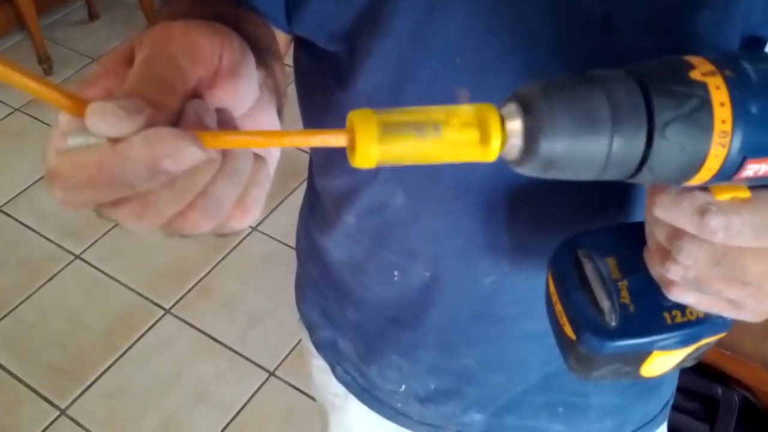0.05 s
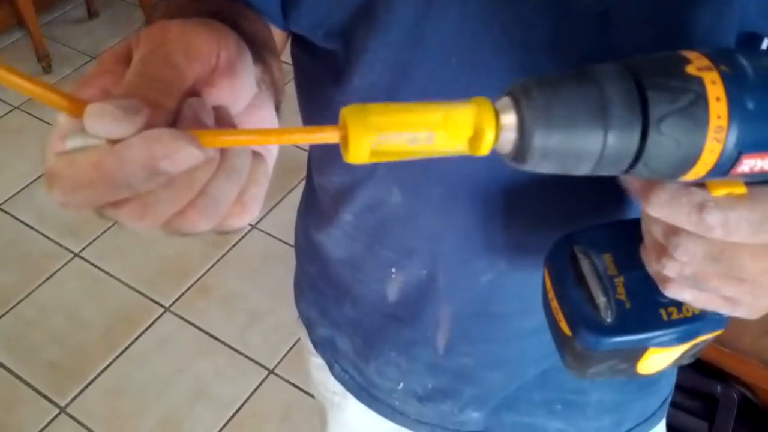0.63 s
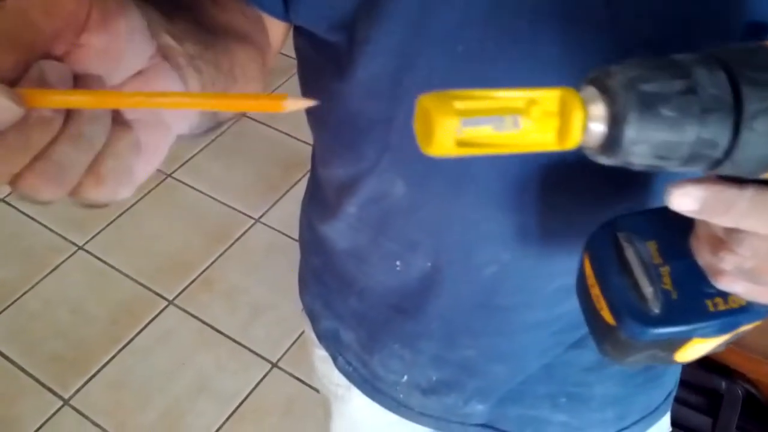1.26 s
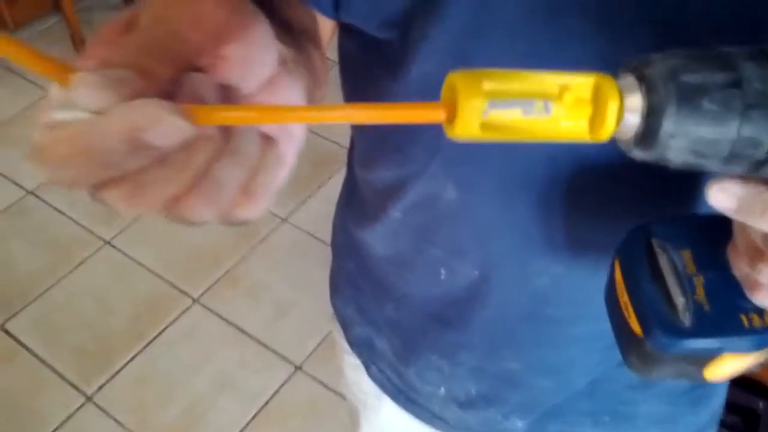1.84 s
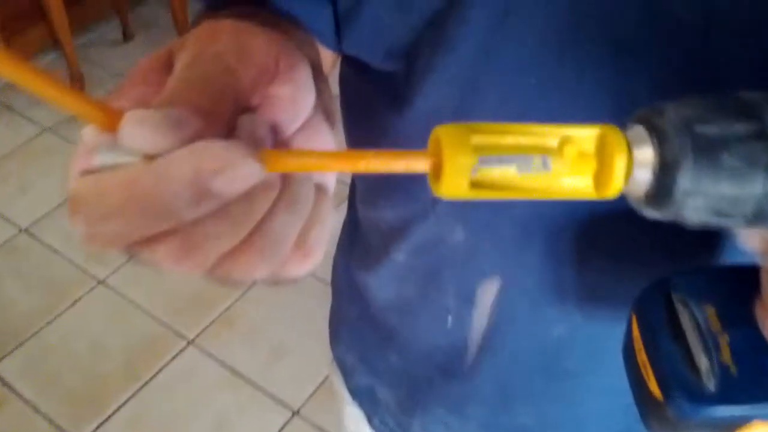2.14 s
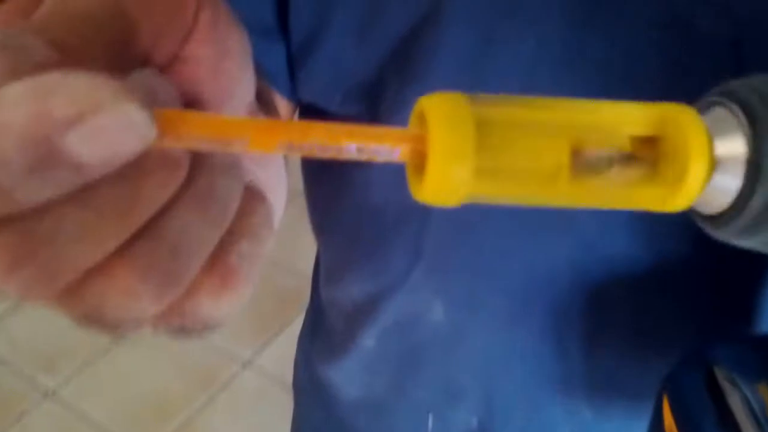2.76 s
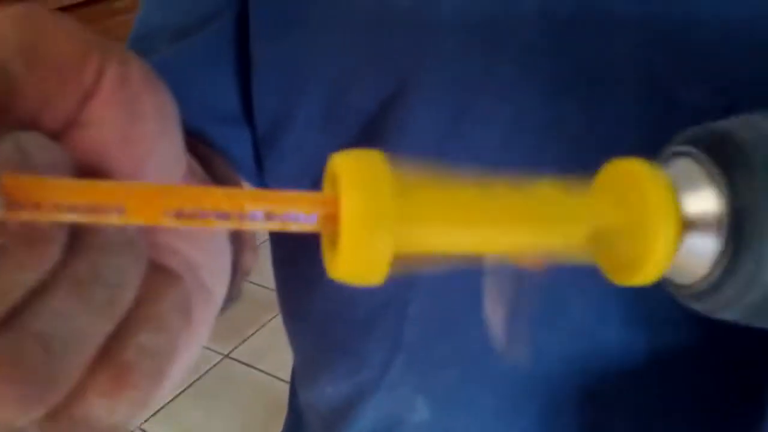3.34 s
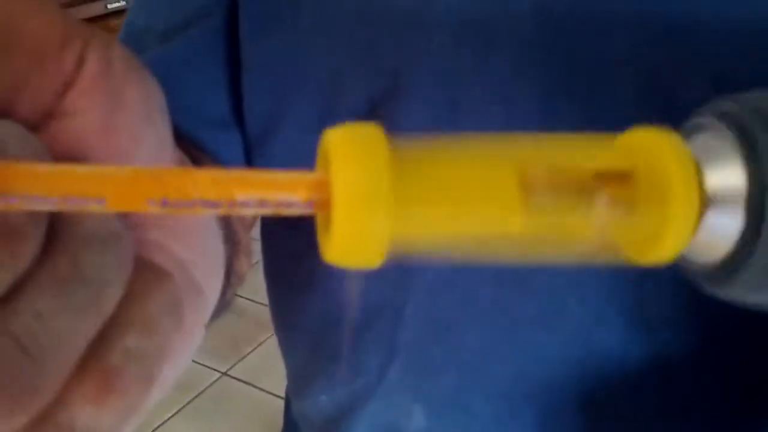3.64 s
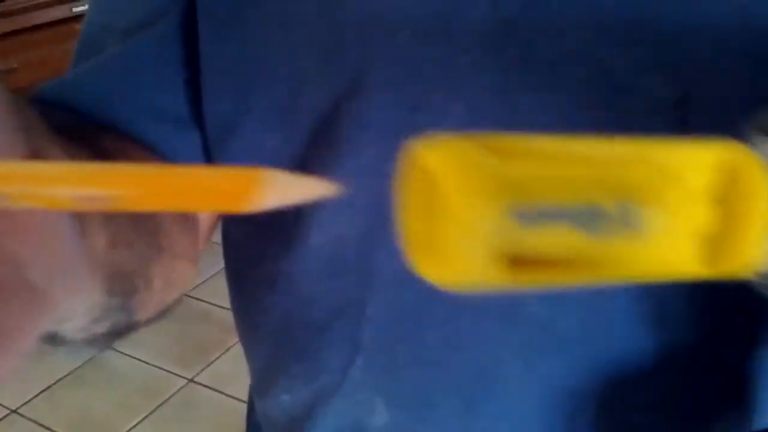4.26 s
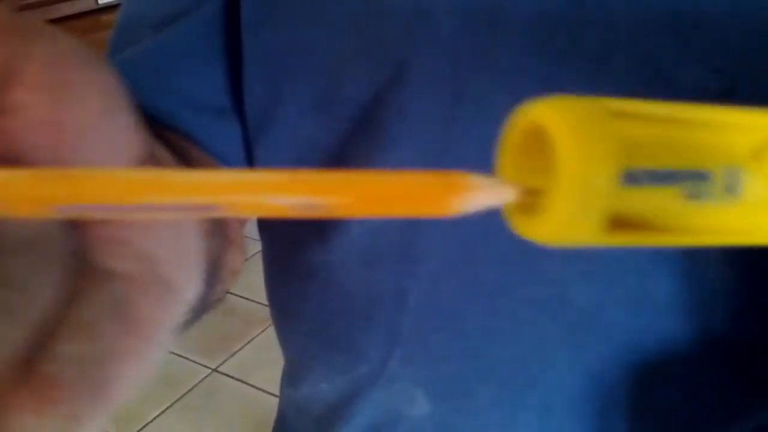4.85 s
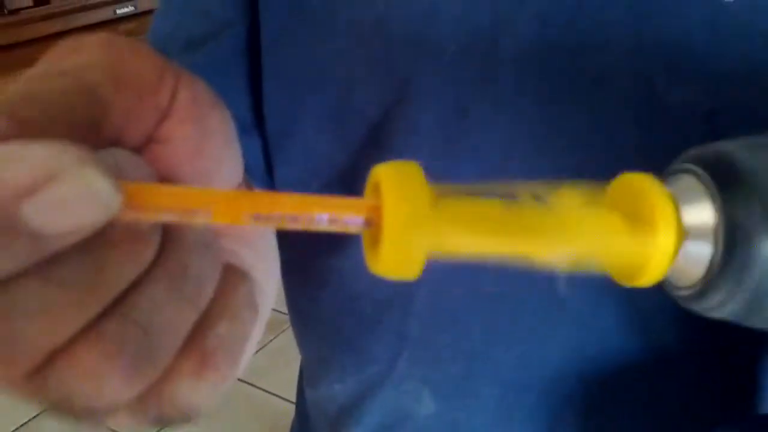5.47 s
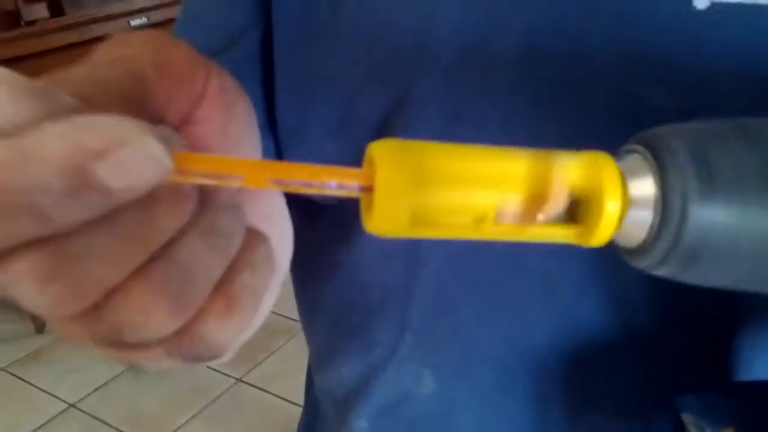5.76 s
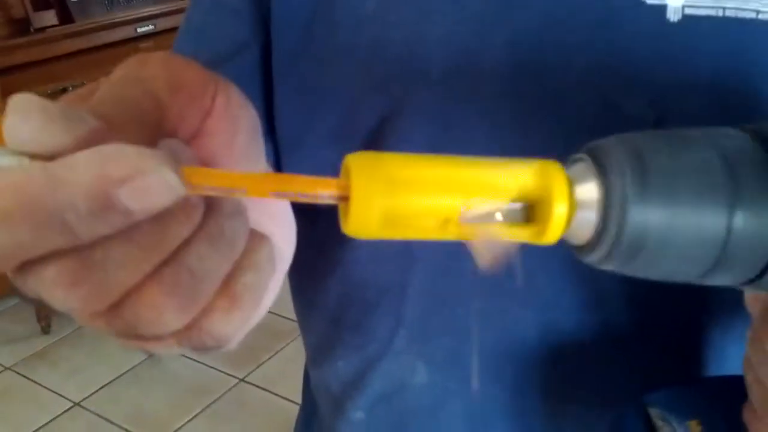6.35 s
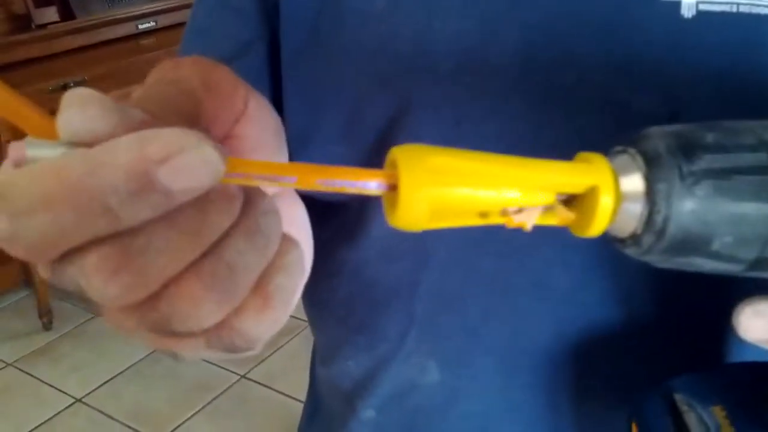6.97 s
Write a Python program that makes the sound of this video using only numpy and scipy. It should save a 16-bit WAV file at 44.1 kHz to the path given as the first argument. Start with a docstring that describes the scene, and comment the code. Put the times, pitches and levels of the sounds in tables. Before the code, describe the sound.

Three short runs of a whining power drill turn a pencil sharpener, rasping and snapping off wood chips, each stopping with a clack.

```python
"""A cordless drill turns a plastic pencil sharpener in three bursts, near a mono microphone in a tiled room.
It is running at the start: the motor hums, gears and brushes rattle, the blade rasps, wood chips snap off.
At 0.6 s it brakes with a clack; the pencil slides out and in. In the second burst (2.2-3.9 s) a puff,
then a hard knock, reach the microphone. The pencil slides again, the third burst (5.3-6.7 s) brings
one more puff, and a last slide and a few taps follow. Room rumble and an appliance hum lie underneath."""
import sys
import numpy as np
from scipy import signal
from scipy.fft import rfft, irfft, next_fast_len
from scipy.io import wavfile
from scipy.ndimage import uniform_filter1d, map_coordinates

SR = 44100
rng = np.random.default_rng(int(sys.argv[2]) if len(sys.argv) > 2 else 0)


def inscribe(sig):
    """Save sig as 16-bit PCM at rate SR to the path in sys.argv[1].

    A 1-D sig is mono; a 2-D sig holds one channel per row.
    Samples are clipped to [-1, 1] before scaling.
    """
    pcm = np.round(np.clip(np.atleast_2d(sig).T, -1, 1) * 32767)
    wavfile.write(sys.argv[1], SR, pcm.astype(np.int16))


N = 313551
T = np.arange(N) / SR
FULL_SPEED_HZ = 350  # nominal shaft speed


def amp(db):
    """Decibels to gain."""
    return 10 ** (np.asarray(db) / 20)


def unit(x):
    """x at rms 1."""
    return x / np.sqrt(np.mean(x ** 2) + 1e-20)


def along(points, hz):
    """(freq_hz, value) points read on a log axis."""
    freqs, values = np.transpose(points)
    return np.interp(np.log(hz + 1), np.log(freqs + 1), values)


def wobble(rate_hz, steps=8):
    """Smooth random curve, rate_hz knots a second."""
    knots = rng.standard_normal(int(N * rate_hz / SR) + 4)
    fine = np.arange(len(knots) * steps) / steps
    return np.interp(T * rate_hz, fine, map_coordinates(knots, [fine]))


def colour(x, spectrum, size=4096):
    """x through a minimum-phase filter of (freq_hz, gain_db) points."""
    cepstrum = irfft(np.log(amp(along(spectrum, np.fft.rfftfreq(size, 1 / SR)))))
    cepstrum[1:size // 2] *= 2
    cepstrum[size // 2 + 1:] = 0
    return signal.fftconvolve(x, irfft(np.exp(rfft(cepstrum))))[:len(x)]


def noise(length, spectrum, size=4096):
    """Coloured noise at rms 1."""
    return unit(colour(rng.standard_normal(length), spectrum, size))


def grit(rate_hz, depth_db):
    """Noise in tiny clumps."""
    return unit(rng.standard_normal(N) * amp(depth_db * wobble(rate_hz)))


def add(track, start_s, sound):
    """Mix a sound into the track."""
    part = track[max(round(start_s * SR), 0):][:len(sound)]
    part += sound[:len(part)]


def humps(rows):
    """Sum of bell curves, one per (centre_s, half_width_s, height) row."""
    return sum(height * np.exp(-((T - centre_s) / half_s) ** 2) for centre_s, half_s, height in rows)


def impacts(cycles, scatter_db, jitter_us, t60_s):
    """One uneven pulse per cycle, smeared over many short paths through the housing."""
    at = np.interp(np.arange(1, int(cycles[-1])), cycles, np.arange(N))
    at += rng.standard_normal(len(at)) * jitter_us * SR / 1e6
    gains = amp(scatter_db * rng.standard_normal((len(at), 1)))
    taps = at.astype(int)[:, None] + np.arange(-7, 9)
    offset = taps - at[:, None]
    shapes = np.sinc(offset) * np.cos(np.pi * offset / 16) ** 2  # pulses fall between samples
    pulses = np.bincount(np.clip(taps, 0, N - 1).ravel(), (gains * shapes).ravel(), N)
    t = np.arange(1024) / SR
    paths = rng.standard_normal(len(t)) * amp(-60 * t / t60_s)
    return unit(signal.fftconvolve(pulses, paths)[:N])


# freq_hz, gain_db
FLOOR_SPECTRUM = [(12, -44), (20, -0.5), (47, -1), (85, -12), (122, -0.5), (144, -26), (171, -6.5),
                  (207, -20.5), (282, -15.5), (382, -27), (746, -30.5), (932, -32), (1130, -33),
                  (15500, -51.5)]
# freq_hz, relative_db
APPLIANCE_PARTIALS = [(59.2, -57.5), (118.4, -54), (177.6, -68), (236.9, -65)]


def background():
    """Room rumble and hiss, with the steady hum of an appliance motor."""
    hum = sum(amp(db + 4 + wobble(3)) * np.sin(2 * np.pi * hz * T + .2 * wobble(3))
              for hz, db in APPLIANCE_PARTIALS)
    return hum + amp(-43) * noise(N, FLOOR_SPECTRUM, size=16384)


# freq_hz, t60_s
ROOM_DECAY = [(200, .45), (2000, .55), (6000, .5), (14000, 0.31)]


def room(x):
    """The tiled room's tail, 5 ms late; treble dies sooner."""
    hz, t, bins = signal.stft(rng.standard_normal(SR * 3 // 4), SR, nperseg=256)
    tail = signal.istft(bins * amp(-60 * t / along(ROOM_DECAY, hz)[:, None]), SR, nperseg=256)[1]
    return signal.fftconvolve(x, np.pad(tail / np.linalg.norm(tail), (SR // 200, 0)))[:N]


# start_s, relative_pressure, decay_s
MIC_PUSHES = [(2.684, .1, .006), (3.1513, -6.1, .038), (5.9315, .2, .008)]


def mic_pushes():
    """Air or a chip hits the diaphragm: a pressure step that leaks away."""
    out, t = np.zeros(N), np.arange(SR // 2) / SR
    for start_s, pressure, decay_s in MIC_PUSHES:
        add(out, start_s, pressure * (1 - np.exp(-t / .0004)) * np.exp(-t / decay_s))
    return out


# freq_hz, gain_db
PLASTIC_SPECTRUM = [(710, -45), (1200, -24.5), (1320, -32.5), (1960, -15), (2190, -22), (2570, -10),
                    (2830, -8), (4620, -15), (5730, -6.5), (6440, -10.5), (10100, -2), (12000, -6),
                    (15500, -16)]
# start_s, relative_db, relative_knock_db
PENCIL_TAPS = [(.9118, -35, -22), (.9624, -43, -17), (1.3289, -45.5, -19), (1.7695, -38, -20),
               (1.9554, -31, -19), (1.9602, -20, -32), (1.9794, -38, -12), (2.1924, -47, -8),
               (2.2435, -40, -10), (4.1214, -40, -8), (4.8648, -33, -19), (4.8748, -31.5, -23),
               (4.8868, -29, -12), (5.1043, -28, -20), (5.2834, -34, -13), (6.9666, -29, -26),
               (6.98, -27, -26), (6.9967, -26.5, -36), (7.0743, -30, -11), (7.0953, -15.5, -36)]
# start_s, length_s, level_db
PENCIL_SLIDES = [(.91, .08, -56), (1.755, .055, -55.5), (1.9, .07, -53.5), (4.07, .07, -54),
                 (4.87, .04, -50), (5.03, .09, -51.5), (5.24, .11, -55), (6.965, .145, -48)]


def handling(edge_s=.02):
    """Pencil and fingers tap the plastic; the pencil slides along the bore."""
    out, t = np.zeros(N), np.arange(SR // 20) / SR
    knock_spectrum = [(300, -13.5), (1700, -11.5), (2200, 5), (3000, -4.5), (4300, -.5), (9000, -20.5)]
    attack = 1 - np.exp(-t / .0011)
    for start_s, db, knock_db in PENCIL_TAPS:
        tick = noise(len(t), PLASTIC_SPECTRUM) * amp(-60 * t / .016)
        knock = noise(len(t), knock_spectrum) * amp(-60 * t / .028)
        add(out, start_s, amp(db - 3) * attack * (tick + amp(knock_db + 7) * knock))
    strokes = sum(amp(db) * np.clip(np.minimum(T - start_s, start_s + length_s - T) / edge_s + .5, 0, 1)
                  for start_s, length_s, db in PENCIL_SLIDES)
    return out + strokes * unit(colour(grit(250, depth_db=3), PLASTIC_SPECTRUM))


# start_s, level_db
BRAKE_CLACKS = [(.624, -22), (0.64, -30.5), (3.879, -24.5), (3.893, -31.5), (6.667, -20), (6.686, -32)]
# freq_hz, gain_db
CLACK_SPECTRUM = [(200, -19), (550, 3), (1000, 2.5), (2000, 3), (3400, -2), (6000, -2.5), (11000, 3),
                  (15500, -14)]


def brakes():
    """As the brake bites, the chuck runs on and clacks through the play in the gears."""
    out, t = np.zeros(N), np.arange(SR // 10) / SR
    envelope = (1 - np.exp(-t / .0015)) * amp(-60 * t / .094)
    for start_s, db in BRAKE_CLACKS:
        add(out, start_s, amp(db) * envelope * noise(len(t), CLACK_SPECTRUM))
    return out


# start_s, end_s, pitch_hz, level_db, fade_db_per_s
SWITCHING_TONES = [(-1, .6, 4202, -36.3, 1), (2.244, 3.88, 4200, -35.5, 16), (5.322, 5.45, 4180, -35.5, 55),
                   (5.45, 6.65, 3838, -47.5, 0)]


def controller(speed_hz, sag_hz=110, settle_s=.04):
    """Chopped current makes the windings sing: flat and soft at first, warbling at low speed."""
    stalled = np.clip(1 - speed_hz / 240, 0, 1)
    warble = .042 * stalled * np.tanh(3 * np.sin(2 * np.pi * 60 * T + 1.5 * wobble(60)))
    out = np.zeros(N)
    for start_s, end_s, hz, db, fade_db_per_s in SWITCHING_TONES:
        on = (T > start_s) & (T < end_s)
        age_s = T[on] - start_s
        unsettled = np.exp(-age_s / settle_s)
        phase = 2 * np.pi * np.cumsum((hz - sag_hz * unsettled) * (1 + warble[on])) / SR
        overtones = amp(-6.5) * np.sin(2 * phase) + amp(-9.5) * np.sin(3 * phase)
        tone = np.sin(phase) + (1 + stalled[on]) * overtones
        out[on] += amp(db - fade_db_per_s * age_s - 9 * unsettled) * tone
    return out


# centre_s, half_width_s, level_db
BLADE_SCRAPES = [(2.45, .04, -24), (2.68, .025, -20), (2.93, .04, -19.5), (5.51, .035, -18.5)]
# freq_hz, gain_db
SHAVING_SPECTRUM = [(1500, -30), (6500, -16), (9500, -2), (11000, 0), (15500, -8)]


def scrapes():
    """The blade catches and shaves off a longer strip with a gritty hiss."""
    envelope = humps([(centre_s, half_s, amp(db)) for centre_s, half_s, db in BLADE_SCRAPES])
    return envelope * unit(colour(grit(700, depth_db=3), SHAVING_SPECTRUM))


def crumbs(speed_hz, drive, count=60, per_s=4):
    """Rows for chips(): small ones shed at random while the blade turns fast."""
    cutting_s = np.cumsum(drive * (speed_hz > .8 * FULL_SPEED_HZ)) / SR
    due_s = (np.arange(count) + rng.random(count)) / per_s
    times_s = np.interp(due_s[due_s < cutting_s[-1]], cutting_s, T)
    return [(time_s, rng.normal(-13, 2), 7700 * np.exp(rng.normal(0, .1)), -31) for time_s in times_s]


# time_s, relative_db, pitch_hz, relative_knock_db
LARGE_CHIPS = [(.0638, -2, 7900, -29), (.1361, -2.5, 8450, -38), (.3142, -4, 8300, -33),
               (.5082, 1, 7200, -26), (2.4122, -8, 8000, -30), (2.42, -2.5, 7700, -27),
               (2.4329, -1.5, 8700, -25), (2.6713, -7, 8150, -30), (2.6838, -1, 7840, -24),
               (2.8704, 2.5, 7700, -43), (3.1373, -2, 7650, -36), (3.2344, -6, 7410, -38),
               (3.3363, -1.5, 7670, -30), (3.5164, 4, 7450, -32), (3.6104, -5, 5200, -41),
               (3.7904, -5.5, 7750, -31), (5.4874, 0, 8700, -25), (5.5069, -3, 7780, -24),
               (5.7099, 2, 7840, -33), (5.7538, -1.5, 7390, -24), (5.7768, -6.5, 3900, -35),
               (5.9309, 1, 7870, -25), (5.9549, -3, 7570, -32), (6.0945, 0, 7370, -24),
               (6.109, -1, 7600, -27), (6.1854, -4.5, 5600, -27), (6.272, 1, 8430, -39),
               (6.3472, -5.5, 3900, -36)]


def chips(small_chips, lead_s=.012):
    """Each wood chip tears for a few milliseconds, cracks off, pings and knocks the sharpener."""
    out, t = np.zeros(N), np.arange(SR // 16) / SR - lead_s
    from_peak_s = np.abs(t - .0016)
    for time_s, db, hz, knock_db in LARGE_CHIPS + small_chips:
        ragged_db = 4 * unit(uniform_filter1d(rng.standard_normal(len(t)), SR // 700))
        tearing = .09 * amp(ragged_db - 60 * from_peak_s / .1)
        envelope = amp(-60 * from_peak_s / .0055) + tearing
        ping = noise(len(t), [(hz * .1, -36), (hz * .63, -26), (hz * .88, -6), (hz * .958, 0),
                              (hz * 1.2, -8), (hz * 2.9, -20)])
        crack = noise(len(t), [(400, -26), (1500, -16.5), (5000, -10), (11000, 0), (15000, -3)])
        knock = noise(len(t), [(120, -7.5), (600, -1.5), (2000, -4), (4000, -7), (9000, -35)])
        snap = ping + .96 * crack + amp(knock_db + 9.5) * knock
        add(out, time_s - lead_s, amp(db - 6) * envelope * snap)
    return out


# freq_hz, level_db
HOUSING_RESPONSE = [(390, -56), (450, -43), (490, -38), (520, -36.5), (600, -36)]


def motor_hum(mesh_cycles):
    """The housing radiates a tone at the gear mesh rate."""
    level_db = along(HOUSING_RESPONSE, np.gradient(mesh_cycles) * SR) + .9 * wobble(90)
    return amp(level_db) * np.sin(2 * np.pi * mesh_cycles + .1 * wobble(90))


# harmonic, relative_db
WHINE_PARTIALS = [(2, -18), (3, -16), (4, -13), (5, -15), (6, -19), (7, -9.5), (8, -10), (9, -11),
                  (10, -14), (15, -8), (22, -5), (26, 2)]
# freq_hz, gain_db
GEARBOX_RESPONSE = [(700, 2), (930, 9), (1040, -1), (1200, 5), (1400, 1), (1900, 3), (3100, -4),
                    (3600, 3.5), (4100, -3), (4700, .5), (5200, -3), (9000, 0), (13300, 0), (14500, -10)]


def gear_whine(mesh_cycles, speed_hz):
    """Harmonics of the hum, lifted near the gearbox resonances."""
    partials = sum(amp(db + 2.5 * wobble(14)) * np.sin(2 * np.pi * k * mesh_cycles + .7 * wobble(45))
                   for k, db in WHINE_PARTIALS)
    return amp(-40) * (speed_hz / FULL_SPEED_HZ) ** 2 * colour(partials, GEARBOX_RESPONSE)


# freq_hz, gain_db
RASP_SPECTRUM = [(150, -31), (380, -18), (550, -12), (750, -13), (1050, -3.5), (1350, -6), (1600, -2),
                 (1900, 4), (2120, 2.5), (2350, -3), (2700, -2), (3300, -17), (5000, -48)]


def blade_rasp(turns):
    """The blade cuts wood fibres, pulsing with the motor shaft."""
    fibres = .4 * impacts(turns, scatter_db=5.5, jitter_us=30, t60_s=.0082) + grit(400, depth_db=1)
    return unit(colour(fibres, RASP_SPECTRUM))


# freq_hz, gain_db
GROWL_SPECTRUM = [(380, -24), (560, 1), (750, -1), (1000, -4.5), (1600, -20)]


def gear_growl(speed_hz):
    """The gears growl under torque while the motor is slow."""
    torque = np.clip(1 - speed_hz / 285, 0, 1)
    return 3.1 * torque * unit(colour(grit(200, depth_db=1), GROWL_SPECTRUM))


# freq_hz, gain_db
GEAR_SPECTRUM = [(1800, -31), (2700, -12.5), (3200, -3.5), (3600, -2.5), (4050, -13), (4700, -2.5),
                 (5600, -4), (6400, -7.5), (7700, -1), (8700, -2), (9500, -3), (11500, -31)]


def gear_rattle(mesh_cycles, load):
    """Meshing teeth rattle the housing."""
    teeth = impacts(mesh_cycles, scatter_db=3, jitter_us=19, t60_s=.013)
    return unit(colour(load * (.36 * teeth + grit(1500, depth_db=2.5)), GEAR_SPECTRUM))


# freq_hz, gain_db
BRUSH_SPECTRUM = [(7500, -40.5), (9400, -15), (10100, -3.5), (10400, -2.5), (10750, 0.5), (11300, -3.5),
                  (11800, -5.5), (12500, -10), (13100, -8), (14300, -12.5), (15700, -18)]


def brushes(turns, mesh_cycles, load, speed_hz, can_hz=10775, width_hz=450):
    """Brush contacts sizzle and ring the motor can, harder the faster it turns."""
    contacts = sum(impacts(cycles, scatter_db=2, jitter_us=4.6, t60_s=.009)
                   for cycles in (turns, mesh_cycles))
    sizzle = unit(colour(load * (.5 * contacts + grit(1200, depth_db=1.5)), BRUSH_SPECTRUM))
    resonance = signal.iirpeak(can_hz, can_hz / width_hz, fs=SR)
    can = unit(signal.lfilter(*resonance, load * (.94 * contacts + grit(900, depth_db=1.5))))
    return .85 * sizzle + (.3 + .45 * (speed_hz / np.max(speed_hz)) ** 16) * can


# press_s, release_s, shaft_hz, creep_hz_per_s, spin_up_s, gear_db, blade_db, brush_db
TRIGGER_PULLS = [(-1, .617, 323, 17, .15, -2.8, -.5, -2.4), (2.244, 3.88, 310.9, 26.2, .165, .2, .8, -.8),
                 (5.322, 6.656, 339.5, 47, .135, -1, -1.1, -.3)]


def motor(squeeze_s=.033, cut_s=.016, coast_s=.11, unpowered_db=-26):
    """Each pull spins the shaft up and it creeps faster; on release the drive dies and it runs down."""
    speed_hz, drive, layer_gains = np.zeros(N), np.zeros(N), np.ones((3, N))
    for press_s, release_s, shaft_hz, creep_hz_per_s, spin_up_s, *layers_db in TRIGGER_PULLS:
        held_s = np.clip(T, press_s, release_s) - press_s
        released_s = np.maximum(T - release_s, 0)
        rolling = np.exp(-released_s / coast_s)
        speed_hz += (shaft_hz + creep_hz_per_s * held_s) * (1 - np.exp(-held_s / spin_up_s)) * rolling
        squeeze = 1 - np.exp(-(held_s / squeeze_s) ** 2)
        drive += squeeze * np.maximum(np.exp(-released_s / cut_s), amp(unpowered_db) * rolling)
        layer_gains[:, T > press_s] = amp(layers_db)[:, None]
    return speed_hz, drive, layer_gains


# centre_s, half_width_s, boost_db
BLADE_BITES = [(.03, .12, 3), (2.86, .25, 6.3), (5.62, .13, 6)]


def drill(speed_hz, drive, layer_gains):
    """All parts follow the motor shaft; the noise swells as the pencil is pressed into the blade."""
    turns = np.cumsum(speed_hz * (1 + .00063 * wobble(40))) / SR
    mesh_cycles, planet_turns = 1.5 * turns, 1.37 * turns
    # the gears bear harder once per turn of the shaft and of the planet wheels
    load = unit(amp(1.3 * np.cos(2 * np.pi * turns) + 1.6 * np.cos(2 * np.pi * planet_turns)))
    bite_db = humps(BLADE_BITES) + .9 * wobble(12)
    layers = [(gear_rattle(mesh_cycles, load), -25.2, 1.2, .15),
              (blade_rasp(turns) + gear_growl(speed_hz), -39, 1.1, 1),
              (brushes(turns, mesh_cycles, load, speed_hz), -18.2, 1.15, .15)]
    out = motor_hum(mesh_cycles) + gear_whine(mesh_cycles, speed_hz)
    for (sound, base_db, speed_power, bite_share), gain in zip(layers, layer_gains):
        level_db = base_db + bite_share * bite_db + .3 * wobble(14)
        out += sound * gain * (speed_hz / FULL_SPEED_HZ) ** speed_power * amp(level_db)
    return drive * out


def scene():
    """All sources at one microphone, the same in both channels."""
    speed_hz, drive, layer_gains = motor()
    tool = drill(speed_hz, drive, layer_gains) + controller(speed_hz) + brakes()
    pencil = chips(crumbs(speed_hz, drive)) + scrapes() + handling()
    near = tool + pencil
    mono = background() + amp(-12.5) * room(near) + mic_pushes() + near
    return np.array([mono, mono])


def record(dry):
    """A hard push pins the preamplifier to its rail, muting it briefly; low cut, clipping, band limit."""
    rail, ceiling = 2.6, .73
    low_cut_hz, top_hz, edge_hz = 50, 15830, 250
    pinned = np.clip(dry, -rail, rail) + amp(-40) * dry
    coupled = signal.lfilter(*signal.butter(1, low_cut_hz, "high", fs=SR), pinned)
    size = next_fast_len(N + SR // 2)
    hz = np.fft.rfftfreq(size, 1 / SR)
    band = np.sin(np.pi / 2 * np.clip((top_hz - hz) / edge_hz + .5, 0, 1)) ** 2
    return irfft(rfft(np.clip(coupled, -ceiling, ceiling), size) * band, size)[:, :N]


dry = scene()
out = record(dry)
inscribe(out)
```